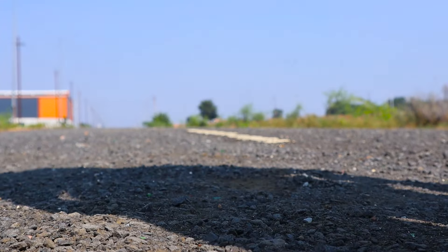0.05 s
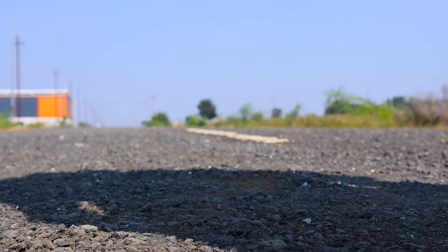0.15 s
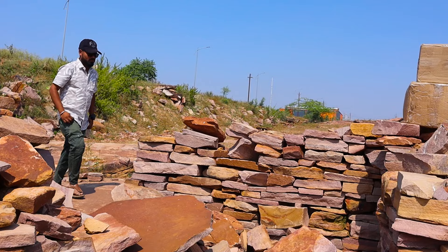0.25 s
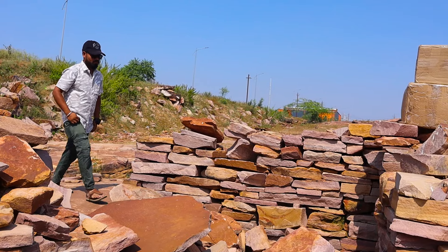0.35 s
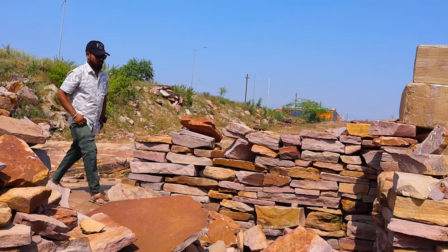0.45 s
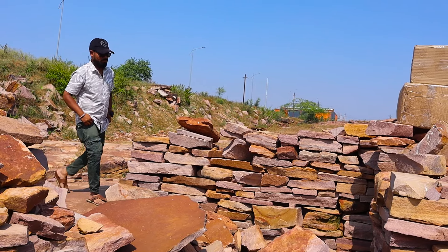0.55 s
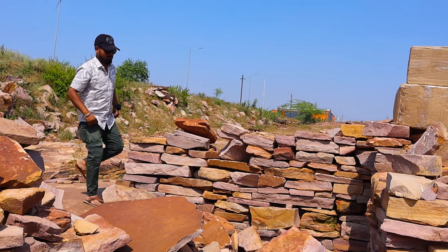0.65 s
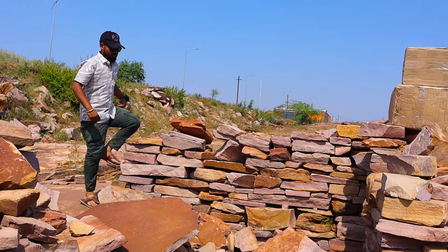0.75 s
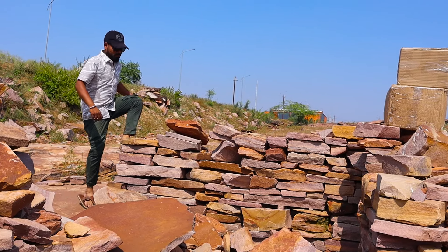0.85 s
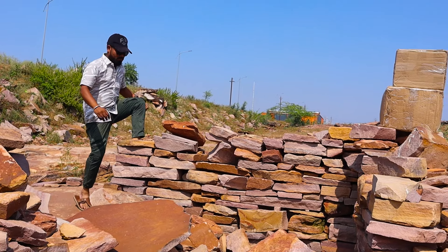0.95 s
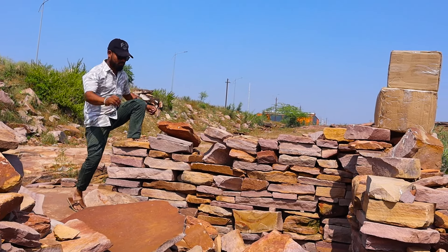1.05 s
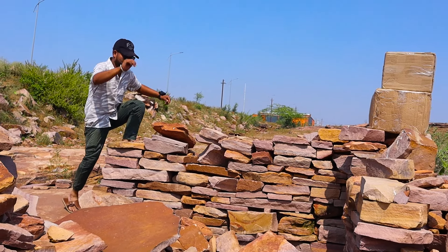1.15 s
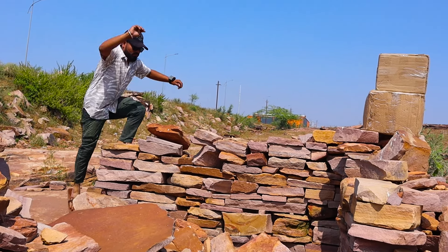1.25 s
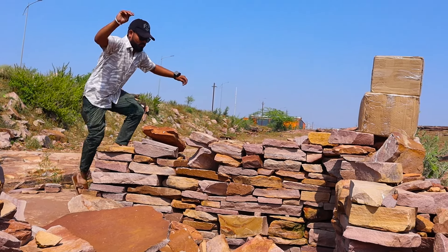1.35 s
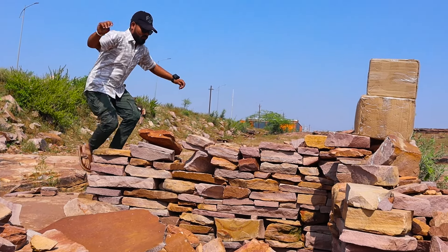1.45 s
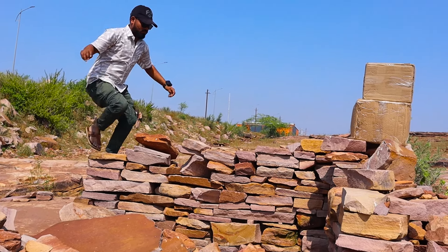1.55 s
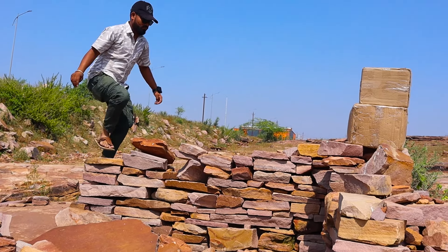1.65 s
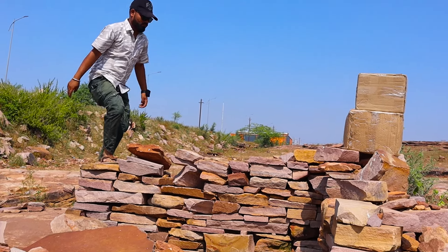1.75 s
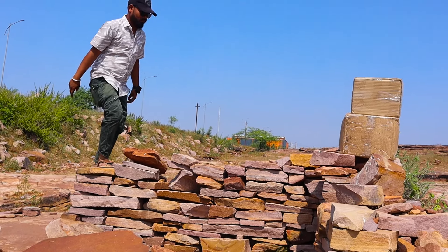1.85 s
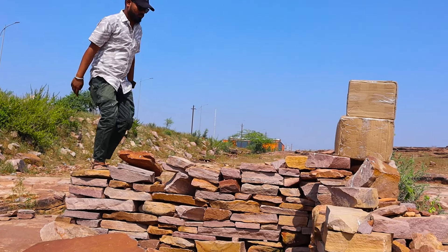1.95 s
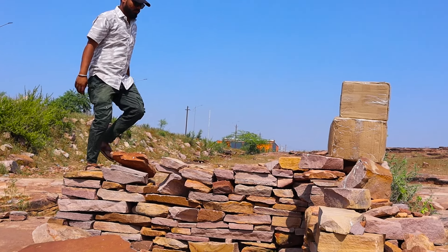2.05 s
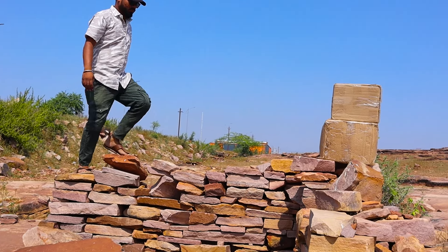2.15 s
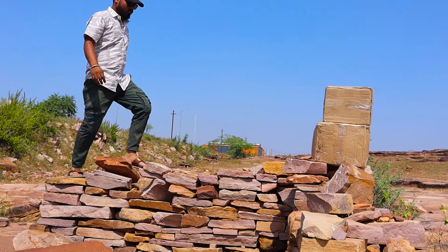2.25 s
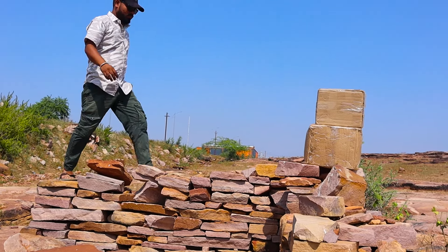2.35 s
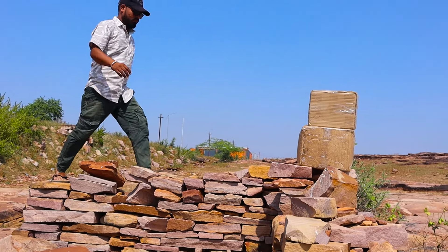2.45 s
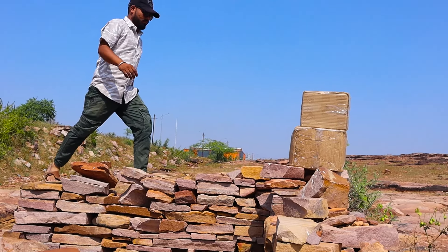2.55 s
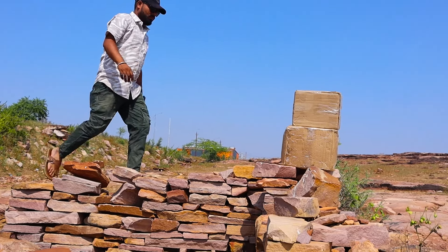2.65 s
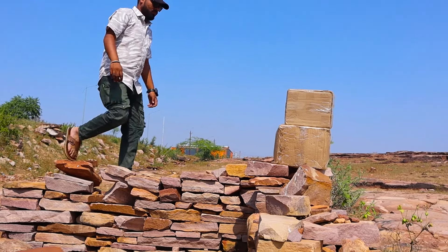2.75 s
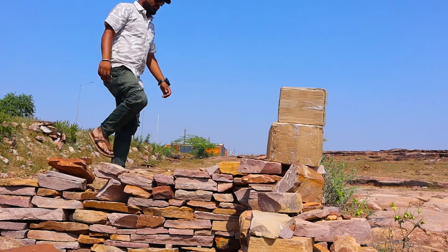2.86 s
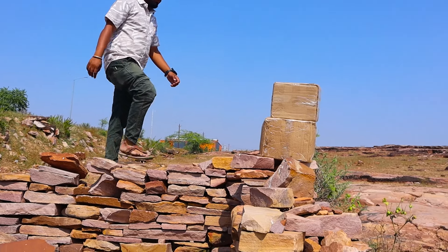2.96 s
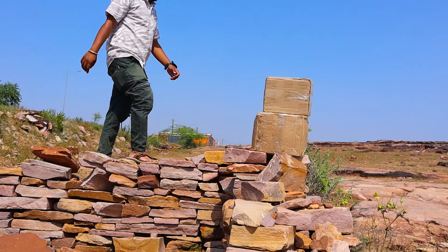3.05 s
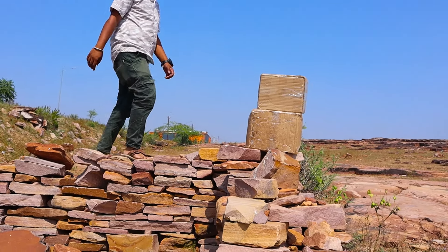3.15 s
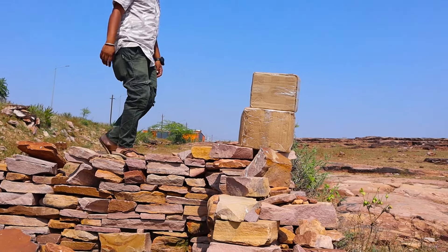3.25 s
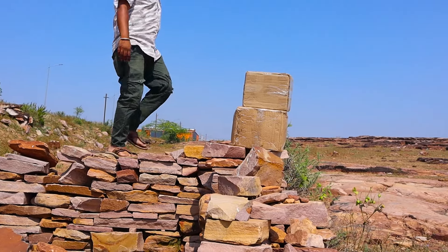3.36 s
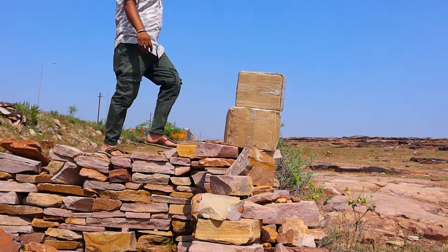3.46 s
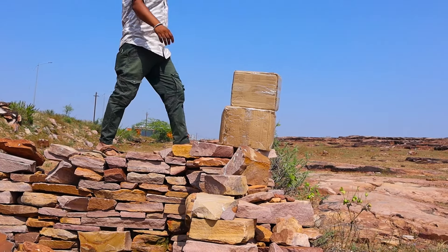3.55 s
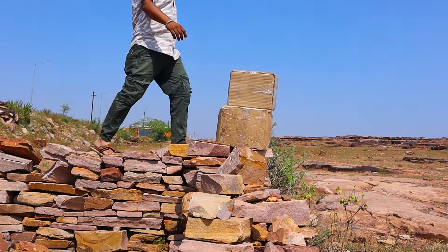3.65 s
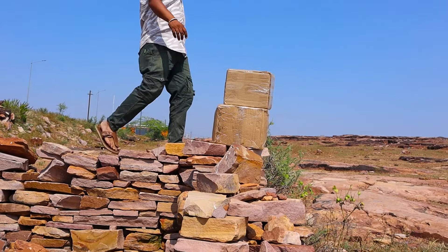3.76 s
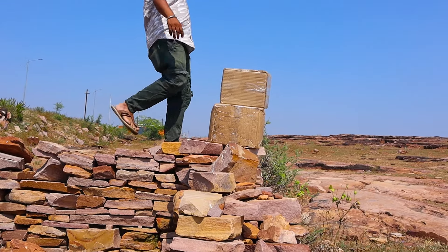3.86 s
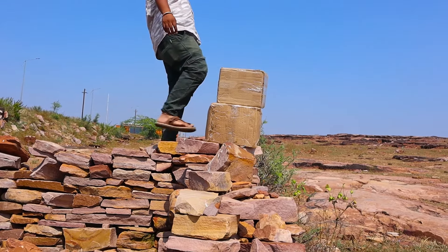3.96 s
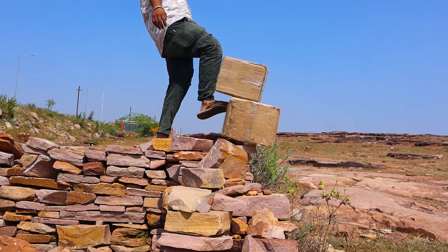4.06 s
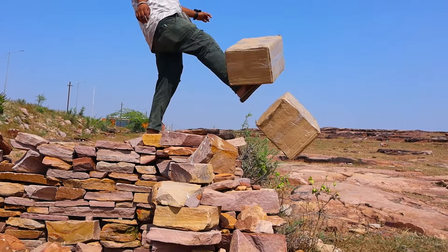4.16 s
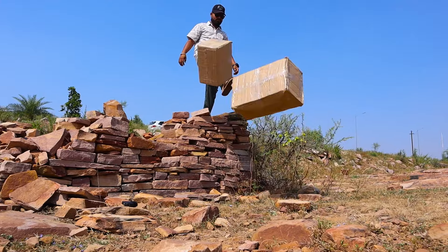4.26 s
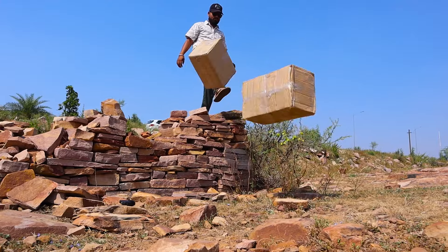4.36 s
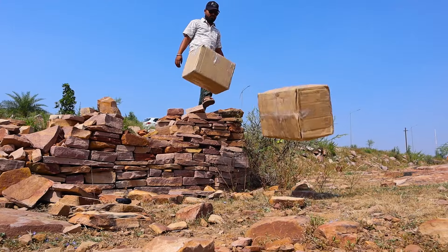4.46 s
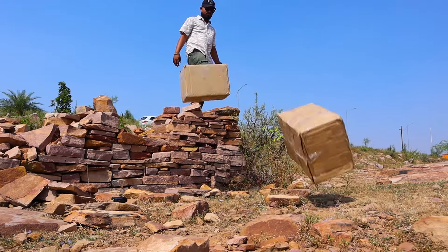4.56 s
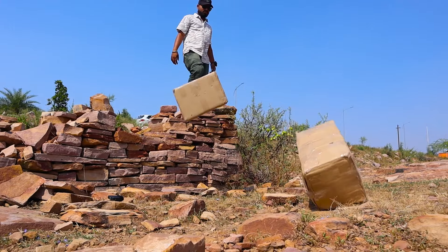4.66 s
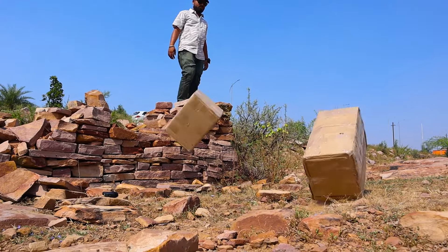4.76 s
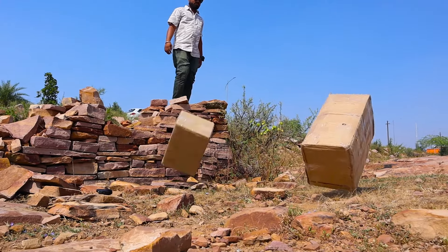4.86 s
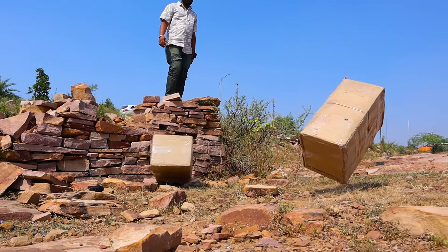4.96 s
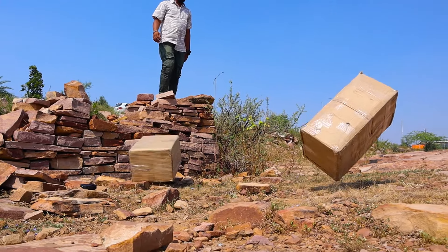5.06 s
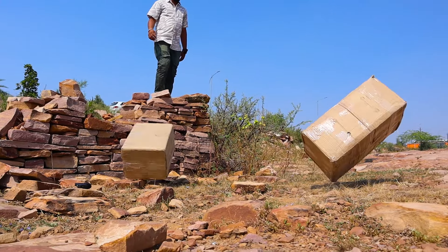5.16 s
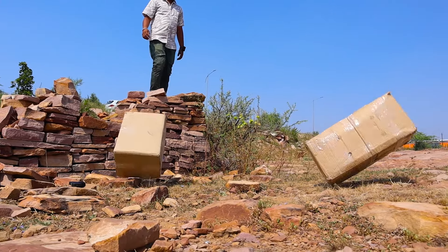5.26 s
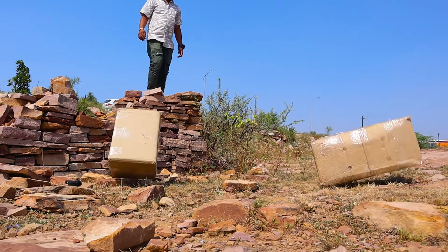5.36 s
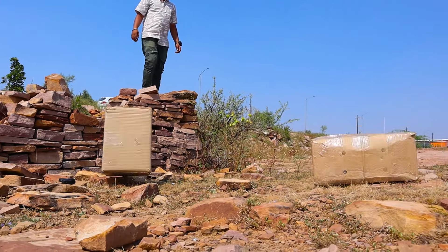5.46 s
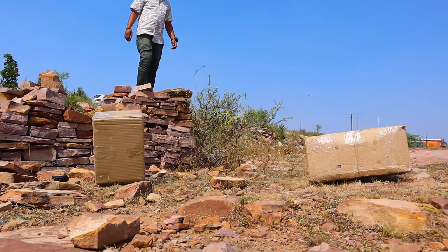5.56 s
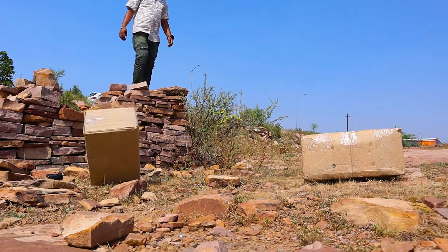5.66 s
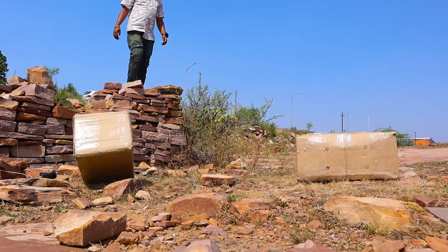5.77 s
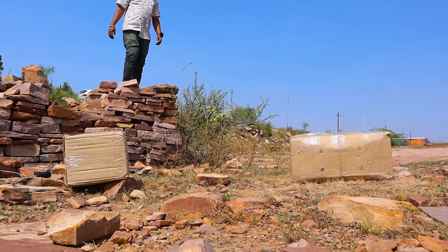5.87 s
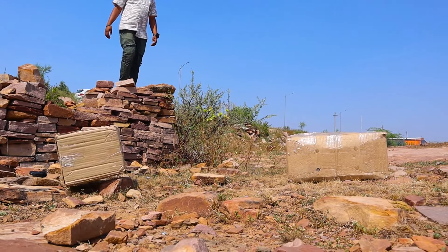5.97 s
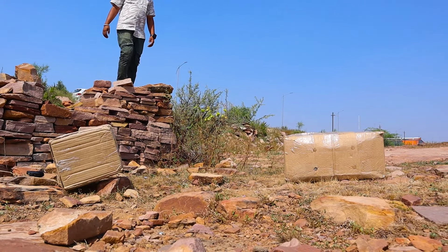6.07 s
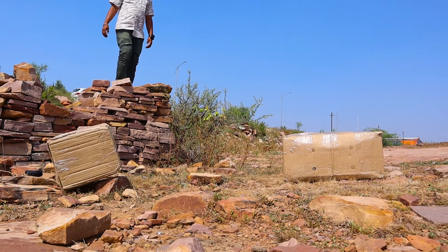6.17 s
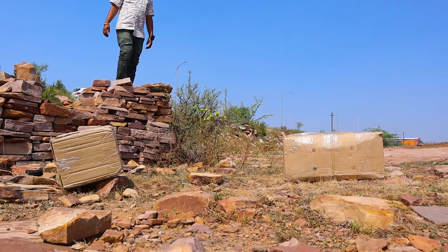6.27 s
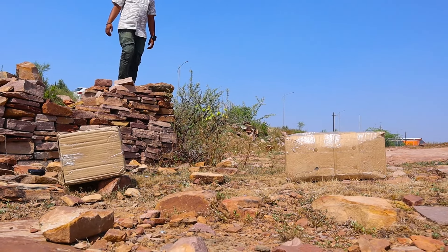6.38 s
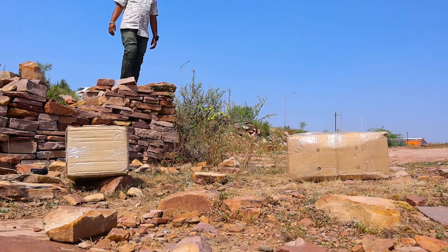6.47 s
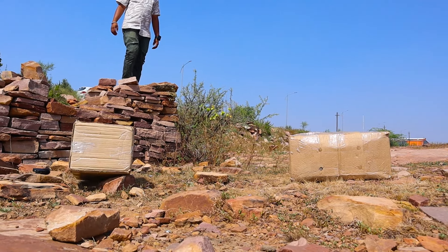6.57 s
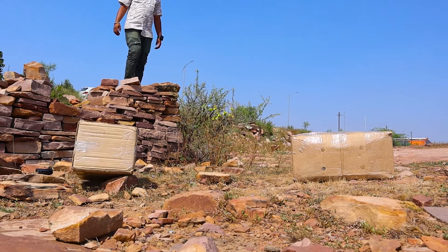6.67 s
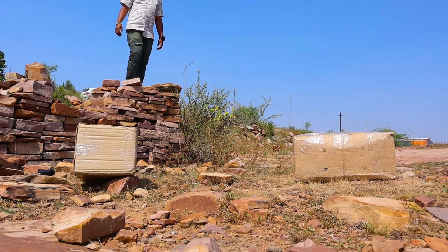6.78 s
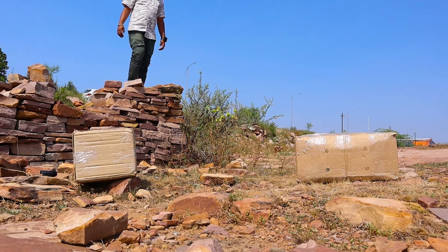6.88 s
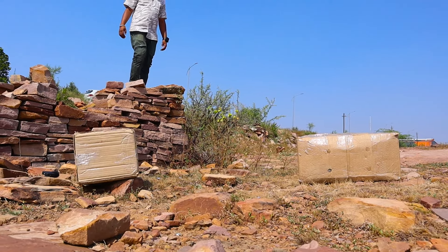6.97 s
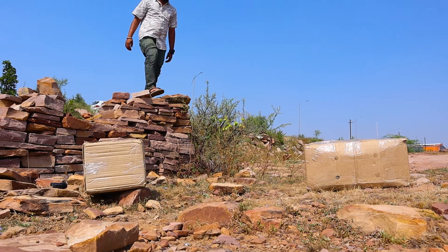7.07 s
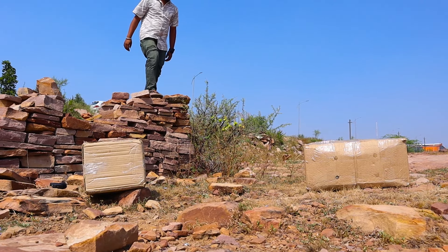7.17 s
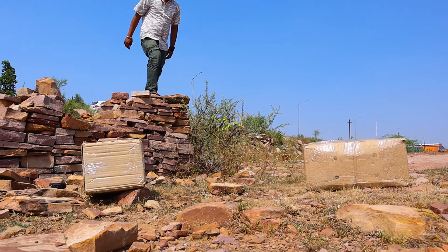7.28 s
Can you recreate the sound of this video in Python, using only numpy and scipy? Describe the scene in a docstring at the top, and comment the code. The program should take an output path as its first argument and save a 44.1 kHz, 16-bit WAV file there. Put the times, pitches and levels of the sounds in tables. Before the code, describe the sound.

Gritty footsteps climb clacking stones before a kick sends two cardboard boxes booming and scraping across gravelly ground.

```python
"""Open ground by a dry-stone wall, with a faint far hum. Sandals scuff over sand and climb the wall,
where loose slabs rock and clack in their short-lived modes. A kick sends two cardboard boxes off the
end: their panels boom as they tumble, and they scrape over gravel and dry weeds in a mass of tiny
impacts. The stereo sound, first heard from the walker's right, cuts abruptly to a listening point
below the wall just after the kick, and cuts back at the end."""
import sys
import numpy as np
from scipy import signal
from scipy.fft import rfft, irfft
from scipy.io import wavfile
from scipy.ndimage import uniform_filter1d

SR = 44100
rng = np.random.default_rng(int(sys.argv[2]) if len(sys.argv) > 2 else 0)


def wav_record(signal):
    """Record a signal, one row per channel, as 16-bit PCM in the file named by sys.argv[1]."""
    frames = np.transpose(np.atleast_2d(signal))
    bounded = np.clip(frames, -1, 1)
    # unit amplitude maps onto the largest positive 16-bit level
    quanta = np.round(bounded * 32767).astype(np.int16)
    wavfile.write(sys.argv[1], SR, quanta)


N = 322812


def undb(db):
    """Amplitude ratio of a level in decibels."""
    return 10 ** (np.asarray(db) / 20)


def unit(x):
    """Normalisation to rms 1."""
    return x / np.sqrt(np.mean(x ** 2))


def colour(x, spectrum):
    """Spectral shaping by (frequency_hz, level_db) points, to rms 1."""
    hz, db = np.transpose(spectrum)
    log_hz = np.log(np.maximum(np.fft.rfftfreq(N, 1 / SR), 1))
    return unit(irfft(rfft(x) * undb(np.interp(log_hz, np.log(hz), db)), N))


def wander(per_s):
    """Random modulation: held values, smoothed twice."""
    hold = int(SR / per_s)
    steps = np.repeat(rng.standard_normal(N // hold + 1), hold)
    return uniform_filter1d(uniform_filter1d(steps, hold), hold)[:N]


def spread(make, coherence):
    """Partial coherence: a scattered source is only partly the same at both ports."""
    shared = make()
    return np.array([np.sqrt(coherence) * shared + np.sqrt(1 - coherence) * make() for _ in range(2)])


def ring(hz, db, t60_s, size):
    """Free vibration: damped modes, detuned and excited a little differently at every blow."""
    t, scatter = np.arange(size) / SR, rng.standard_normal((len(hz), 2))
    hz = hz * (1 + 0.015 * scatter[:, 0])
    decay = np.exp(-np.log(1000) * t / t60_s[:, None])
    return undb(db + 2.87 * scatter[:, 1]) @ (decay * np.sin(2 * np.pi * hz[:, None] * t))


def excite(response, ms, per_s):
    """Convolution of an impulse response with a chatter of touches that swells fast and fades."""
    size = len(response)
    chance, strength = rng.random((2, size))
    age = np.arange(size) / SR / (ms / 1000)
    force = (chance < per_s / SR) * (2 * strength - 1) * np.minimum(.3 + 2 * age, 1) * np.exp(-age ** 2)
    force[0] = .3  # first touch
    return signal.fftconvolve(force, response)[:size]


def add(track, start_s, blow, peak_db):
    """Superposition of one blow at its peak level."""
    i = int(start_s * SR)
    track[i:i + len(blow)] += blow[:N - i] * undb(peak_db) / np.abs(blow).max()


# Spectrum of open-country hiss: frequency_hz, density_db
AIR_SPECTRUM = [(15, -35), (25, -34), (43, -18), (107, 1), (227, -7), (369, -6), (583, -15.5), (5600, -29),
                (15600, -62)]

def air(hum_hz=102):
    """Ambient noise: broadband hiss, a wavering narrowband hum and a breeze rumbling at the ports."""
    hiss = spread(lambda: colour(rng.standard_normal(N), AIR_SPECTRUM), coherence=0.97)
    hum = colour(rng.standard_normal(N), [(hum_hz - 15, -30), (hum_hz, 0), (hum_hz + 15, -30)])
    gusts = undb(4 * wander(2))
    breeze = colour(rng.standard_normal(N), [(15, 3), (50, 27), (200, -47)]) * gusts
    return undb(-45) * hiss + undb(-54) * hum + undb(-67) * breeze


# Modes of a loose slab: pitch_hz, level_db
SLAB_MODES = [(560, -11), (705, -7), (880, -6.5), (1040, -10), (1220, -10.5), (1450, -35.5), (1700, -32),
              (2000, -42), (2270, -31), (2750, -20), (3110, -18.5), (3820, -28), (4400, -5), (5040, -9)]
# Slabs knocking, plus one box bump at 4.276 s played through the same modes: start_s, level_db, pitch_hz,
# relative_crack_db, chatter_ms
SLAB_KNOCKS = [(0.068, -26, 1380, -29, 3.2), (0.521, -21.5, 1430, -11, 5.4), (1.048, -12, 1450, 4, 3.2),
               (1.092, -2, 790, 0, 8.1), (1.146, -3, 1220, -13, 1.45), (1.189, -11, 666, -40, 2.1),
               (1.205, -6.5, 1110, -21, 1.2), (1.551, -17, 770, -13, 1.7), (1.837, -2.5, 1050, 1, 6.9),
               (1.883, -1, 2305, -25, 7.7), (1.938, -7.5, 990, -36, 2.4), (1.988, -9, 640, -36, 1.7),
               (2.261, -18, 417, -32, 3.5), (2.356, -2, 900, -40, 5.5), (2.526, -15.5, 1730, -0.5, 5.3),
               (2.672, -24, 2360, 2.5, 15.6), (3.117, -13.5, 2480, 3.5, 14), (3.124, -9, 960, 2, 5.9),
               (3.146, -16.5, 870, -29, 11.3), (3.168, -14, 870, -32, 7.3), (3.254, -22.5, 2290, -12, 3),
               (3.261, -24.5, 2920, -35, 1.1), (3.389, -6.5, 2000, -36, 0.86),
               (3.635, -22.5, 3080, 26, 4.1), (3.681, -4, 1494, -11, 8.9), (3.693, -5, 754, -38, 8.2),
               (4.257, -10, 1700, -38, 2.9), (4.276, -14.5, 850, -38, 28), (4.51, -32, 1260, -27, 6),
               (6.637, -6.5, 1450, -40, 4)]

def slab_clacks(size=4000):
    """Modal impact: the point struck favours the modes near one pitch; a gritty crack rides on top."""
    track, t = np.zeros(N), np.arange(size) / SR
    mode_hz, mode_db = np.transpose(SLAB_MODES)
    lowpass = signal.butter(2, 7000, fs=SR)
    for start_s, level_db, pitch_hz, crack_db, chatter_ms in SLAB_KNOCKS:
        favour_db = -8 * np.abs(np.log2(mode_hz / pitch_hz))
        hz = np.r_[mode_hz, pitch_hz, 1.09 * pitch_hz]
        t60_s = 0.034 * (1000 / hz) ** 0.83
        modes = ring(hz, np.r_[mode_db + favour_db, -4, -8], t60_s, size)
        crack = signal.lfilter(*lowpass, rng.standard_normal(size)) * np.exp(-t / 0.00073)
        blow = modes / np.abs(modes).max() + undb(crack_db) * crack
        # the slab keeps rocking against its neighbours, which damp its ring
        damped = (blow + 0.1 * crack) * np.exp(-t / 0.0013)
        rattle = undb(-8) * excite(damped, ms=23, per_s=700)
        add(track, start_s, excite(blow, chatter_ms, per_s=2000) + rattle, level_db)
    return track


def grains(per_s, spread_db):
    """Shot noise: random clicks with exponentially distributed levels, capped at the largest stone."""
    chance, polarity, draw = rng.random((3, N))
    level_db = np.minimum(-spread_db * np.log(1 - draw), 16)
    return (chance < per_s / SR) * np.sign(polarity - .5) * undb(level_db)


def pebbles(per_band_per_s):
    """Resonance: lone small stones tick, each with a brief pitch."""
    bands = (signal.iirpeak(hz, 3, fs=SR) for hz in np.geomspace(800, 3600, num=7))
    return unit(sum(signal.lfilter(*band, signal.lfilter(*band, grains(per_band_per_s, 3.8)))
                    for band in bands))


def slide_envelope(slides):
    """Incoherent slides add in power; each is 10 dB down at its swell and fade times from the peak."""
    t, power = np.arange(N) / SR, 0
    for peak_s, level_db, swell_ms, fade_ms in slides:
        away = 1000 * np.abs(t - peak_s) / np.where(t < peak_s, swell_ms, fade_ms)
        power = power + undb(level_db - 10 * away ** 3.2) ** 2
    return np.sqrt(power)


# Spectrum of rubbed sand: frequency_hz, density_db
SAND_SPECTRUM = [(88, -53), (150, -4), (263, -7), (296, -7), (436, -7.5), (1420, -15.5), (5650, -17),
                 (9180, -25), (15500, -37)]
# Soles sliding: peak_s, level_db, swell_ms, fade_ms
SOLE_SLIDES = [(0.15, -44, 48, 19), (0.33, -42.5, 56, 630), (0.58, -35, 101, 78), (0.85, -38, 133, 85),
               (1.02, -42.5, 320, 60), (1.08, -34, 35, 28), (1.31, -50, 74, 60), (1.86, -33, 28, 44),
               (2.03, -37.5, 210, 35), (2.2, -49.5, 350, 260), (2.64, -42, 133, 176), (3.14, -43, 16, 83),
               (3.3, -50, 100, 390), (3.66, -34.5, 18, 68), (3.82, -41.5, 93, 45), (4.13, -25.5, 36, 14),
               (4.25, -35, 116, 35), (7.22, -50.5, 61, 110), (7.32, -32, 22.5, 20)]

def sandal_scuffs():
    """Granular friction: thousands of sand grains and a few pebbles roll under a sole."""
    sand = spread(lambda: colour(grains(5000, 3.2), SAND_SPECTRUM), coherence=.2)
    grit = sand + undb(-12.5) * pebbles(25)
    return grit * slide_envelope(SOLE_SLIDES) * undb(2 * wander(40))


# Small stones ticking: start_s, level_db, centre_hz
STONE_TAPS = [(0.301, -20, 4550), (0.307, -19.5, 3300), (0.327, -25.5, 700), (0.69, -26, 1940),
              (1.927, -16, 2900), (2.817, -27.5, 3000), (2.957, -28.5, 2240), (3.175, -28, 2200),
              (3.18, -27, 2490), (3.287, -28, 2740), (3.298, -33, 3000), (3.335, -32, 2980),
              (3.401, -21.5, 2200), (3.411, -24, 1480), (3.42, -25.5, 2150), (3.879, -26, 1500),
              (4.417, -28, 3400), (4.817, -13, 3500), (4.841, -20, 2190), (4.851, -26, 2500),
              (5.868, -17.5, 5000), (5.94, -13.5, 1800), (6.161, -16.5, 1490), (6.198, -16, 2980),
              (6.221, -9.5, 2980), (6.273, -7, 1830), (6.47, -25, 1940), (6.543, -39, 2500),
              (6.683, -19, 2280), (6.731, -16, 1960), (6.748, -16, 2160), (6.776, -35, 2500),
              (6.881, -18.5, 2800), (6.971, -11.5, 4260), (7.268, -22, 2200)]

def stone_ticks(size=4000, decay_s=0.0021):
    """Heavily damped impact: a burst of band-limited noise with no ring."""
    track, t = np.zeros(N), np.arange(size) / SR
    for start_s, level_db, centre_hz in STONE_TAPS:
        burst = rng.standard_normal(size) * np.exp(-t / decay_s)
        band = signal.iirpeak(centre_hz, 1.6, fs=SR)
        add(track, start_s, signal.lfilter(*band, signal.lfilter(*band, burst)), level_db)
    return track


# Small hard stones skating: start_s, level_db, pitch_hz, skid_ms
STONE_SKIDS = [(1.068, -30, 5000, 22), (1.072, -28, 6200, 8.9), (1.095, -10.5, 4970, 2.5),
               (1.095, -37, 7900, 2.5), (1.149, -20.5, 3830, 1.7), (1.616, -35.5, 5380, 2.6),
               (1.797, -41, 3830, 11), (1.928, -25, 8630, 7), (1.996, -21.5, 2960, 7.1),
               (1.997, -29.5, 7840, 3), (2.36, -21.5, 2220, 4.1), (2.568, -36, 2520, 5),
               (2.725, -36.5, 2480, 5), (3.688, -22, 4440, 11), (4.314, -31, 2810, 16)]

def stone_chinks(size=4000, t60_s=0.028):
    """Repeated excitation of a single mode: a hard stone rings as it skates."""
    track, t = np.zeros(N), np.arange(size) / SR
    for start_s, level_db, pitch_hz, skid_ms in STONE_SKIDS:
        mode = np.exp(-np.log(1000) * t / t60_s) * np.sin(2 * np.pi * pitch_hz * t)
        add(track, start_s, excite(mode, skid_ms, per_s=850), level_db)
    return track


# Modes of a box's panels and enclosed air: pitch_hz, level_db
BOX_MODES = [(95, -11.5), (129, 3.5), (165, 2), (205, -3.5), (240, 0.5), (285, 0), (325, -0.5), (385, -4.5),
             (450, -5.5), (570, -12.5), (700, -9.5), (820, -22), (1020, -13)]
# Boxes struck: start_s, level_db, pitch_hz, contact_ms, relative_grit_db
BOX_BLOWS = [(4.083, 2, 524, 19, -19), (4.208, -12, 277, 8, -13), (4.232, -7.5, 397, 5.7, -24),
             (4.305, -17, 510, 16, -41), (4.531, -24.5, 464, 11.5, -19), (4.779, 5.5, 183, 44.6, -14.5),
             (4.808, 3, 140, 22, -25), (4.837, -10.5, 148, 11.6, -7), (5.03, 3, 248, 10.8, -6.5),
             (5.081, -2.5, 230, 9.7, -20.5), (5.172, 2, 108, 14, -7), (5.2, -2, 238, 19.5, -14),
             (5.281, -21, 132, 8.8, -3), (5.412, -15.5, 270, 28, -13), (5.538, 1, 251, 40, -24.5),
             (5.577, 2.5, 154, 18, -27.5), (5.726, -16, 140, 53, -7.5), (5.805, -16, 194, 31, -50),
             (5.935, -24.5, 153, 9.5, 2.5), (5.994, 3, 320, 16.7, -11.5), (6.01, 1.5, 130, 32.4, -25),
             (6.115, -5, 228, 3.1, -19), (6.216, -14, 144, 25, -6.5), (6.23, -1, 243, 23, -44),
             (6.271, -5, 190, 66, -47), (6.441, -10.5, 179, 10.5, -25), (6.56, -12, 222, 12.3, -31),
             (6.614, -11, 167, 4.4, -14), (6.636, -7, 218, 6.7, -35), (7.011, -13.5, 170, 24, -24)]

def box_thuds(size=10000):
    """Soft impact: a long push drives the panel modes. Returns the boom and the crushed grit's envelope."""
    boom, crush, t = np.zeros(N), np.zeros(N), np.arange(size) / SR
    mode_hz, mode_db = np.transpose(BOX_MODES)
    face_band = signal.butter(2, [250, 1200], "band", fs=SR)
    for start_s, level_db, pitch_hz, contact_ms, grit_db in BOX_BLOWS:
        favour_db = -np.where(mode_hz < pitch_hz, 8.5, 5.5) * np.abs(np.log2(mode_hz / pitch_hz))
        hz = np.r_[mode_hz, pitch_hz]
        t60_s = 0.099 * (150 / hz) ** 0.064
        modes = ring(hz, np.r_[mode_db + favour_db, -6], t60_s, size)
        add(boom, start_s, excite(modes, contact_ms, per_s=1500), level_db)
        # the flat face slaps the ground
        slap = signal.lfilter(*face_band, rng.standard_normal(size)) * np.exp(-t / 0.019)
        add(boom, start_s, slap, level_db - 14.5)
        press = np.minimum(t / 0.0065, 1) * np.exp(-(t / (1.4 * contact_ms / 1000)) ** 1.4)
        add(crush, start_s, press, level_db + grit_db)
    # the panels are too small to radiate deep bass
    return signal.sosfilt(signal.butter(2, 85, "high", fs=SR, output="sos"), boom), crush


def box_rumble(relative_db=-21, t60_s=0.54):
    """Exponential decay: a box keeps rocking after each blow and rumbles in its modes."""
    start_s, level_db = np.transpose(BOX_BLOWS)[:2]
    age_s = np.arange(N) / SR - start_s[:, None]
    power = (age_s > 0) * undb(level_db[:, None] + relative_db - 60 * np.abs(age_s) / t60_s) ** 2
    rumble = colour(grains(2000, 1.1), [(25, -30), *BOX_MODES, (2500, -45)])
    return rumble * np.sqrt(power.sum(axis=0))


# Spectrum of crushed gravel: frequency_hz, density_db
GRAVEL_SPECTRUM = [(180, 3), (300, 1), (590, -9), (821, -8.5), (1240, -11.5), (3070, -11.5), (11500, -46),
                   (13100, -50), (15500, -95)]
# Boxes sliding and rolling over gravel and weeds: peak_s, level_db, swell_ms, fade_ms
BOX_SLIDES = [(4.28, -46.5, 20, 260), (4.68, -47, 520, 170), (4.94, -38, 210, 88), (5.14, -26.5, 115, 155),
              (5.25, -35.5, 66, 200), (5.49, -26, 34, 136), (5.75, -33.5, 116, 250), (5.97, -30.5, 65, 180),
              (6.19, -31, 70, 197), (6.48, -27.5, 21, 16), (6.61, -24.5, 83, 74), (6.74, -27.5, 48, 92),
              (6.86, -34, 22, 75), (7.03, -29.5, 84, 96)]

def gravel_crunch(crush):
    """Granular friction: coarse grains shift under the struck and dragging boxes."""
    gravel = spread(lambda: colour(grains(2500, 3.4), GRAVEL_SPECTRUM), coherence=.15)
    grit = gravel * undb(2 * wander(80)) + undb(-14.5) * pebbles(22)
    return grit * (crush + slide_envelope(BOX_SLIDES))


def wall_reflections(blows, size=4000, t60_s=0.04):
    """Diffuse scattering: rocks and wall send a different short tail to each port."""
    fade = np.exp(-np.log(1000) * np.arange(size) / SR / t60_s)
    tails = np.diff(rng.standard_normal((2, size + 1))) * fade * undb(-40)
    return signal.fftconvolve(blows[None], tails, axes=1)[:, :N]


# Microphone response beside and below the wall: frequency_hz, left_lead_rad, left_minus_right_db
PORTS_BESIDE_WALL = [(101, 0.25, -1.5), (370, 1.14, 3), (990, 1.1, 14), (3330, 1.35, 17), (6960, 2.33, 15),
                     (16200, 2, -1.5)]
PORTS_BELOW_WALL = [(103, -0.1, 0), (340, -2, -8.5), (720, -2, -13), (4130, -1.56, -12), (14500, -2, 0.5)]

def ports(sound, response):
    """Directivity and path difference: each port favours its own side, and the far one hears later."""
    hz, lead_rad, difference_db = np.transpose(response)
    log_hz = np.log(np.maximum(np.fft.rfftfreq(N, 1 / SR), 1))
    log_ratio = np.interp(log_hz, np.log(hz), 1j * lead_rad + difference_db * np.log(10) / 20)
    return irfft(rfft(sound) * np.exp([log_ratio / 2, -log_ratio / 2]), N)


def scene(cut_below_s=4.265, cut_back_s=7.05):
    """Superposition of all sources, with abrupt cuts between two listening points."""
    t = np.arange(N) / SR
    back = np.clip((t - cut_back_s) / .004 + .5, 0, 1)
    below = np.clip((t - cut_below_s) / .01 + .5, 0, 1) - back
    beside = 1 - below
    boxes_heard = 1 - back
    boom, crush = box_thuds()
    stones = slab_clacks() + stone_chinks() + stone_ticks()
    # small slabs radiate no bass
    stones = signal.sosfilt(signal.butter(4, 260, "high", fs=SR, output="sos"), stones)
    blows = stones + boom * boxes_heard
    sound = blows + wall_reflections(blows) + sandal_scuffs() * beside
    sound += (gravel_crunch(crush) + box_rumble()) * boxes_heard
    sound += air() * undb(-3.5 * below)
    return ports(sound * beside, PORTS_BESIDE_WALL) + ports(sound * below, PORTS_BELOW_WALL)


def record(dry, bass_hz=30, top_hz=15730):
    """Band limiting and overload: the bass is rolled off, loud peaks clip, the top is cut."""
    trimmed = signal.sosfilt(signal.butter(2, bass_hz, "high", fs=SR, output="sos"), dry)
    clipped = np.clip(trimmed, -.99, .99)
    return signal.sosfilt(signal.ellip(10, .2, 70, top_hz, fs=SR, output="sos"), clipped)


dry = scene()
out = record(dry)
wav_record(out)
```